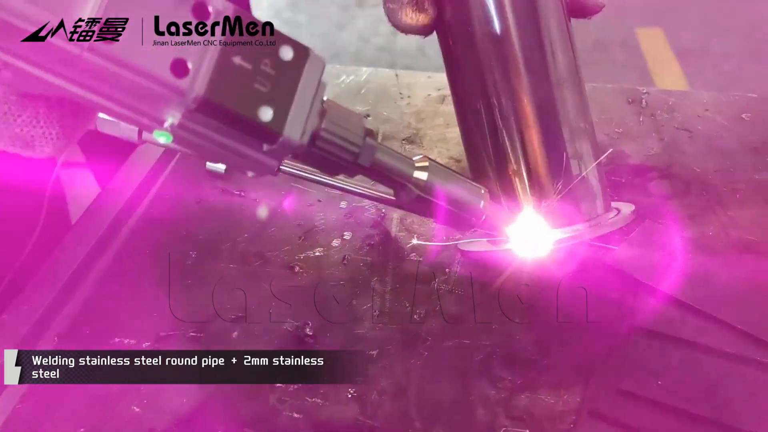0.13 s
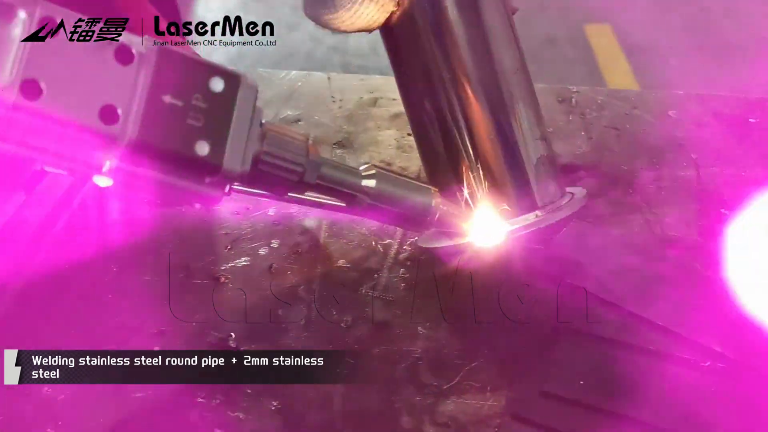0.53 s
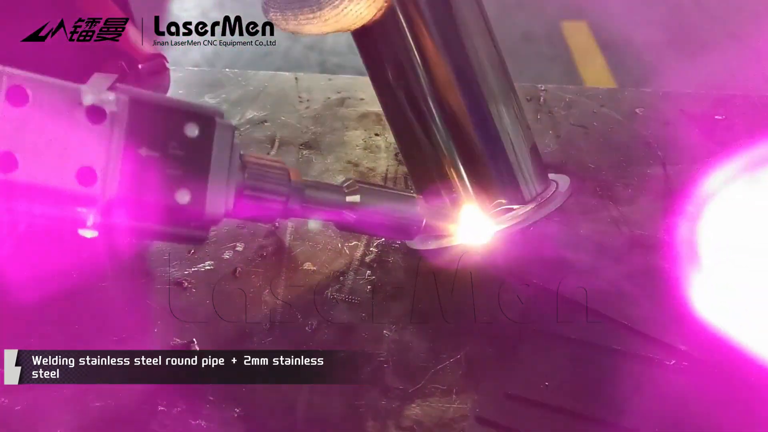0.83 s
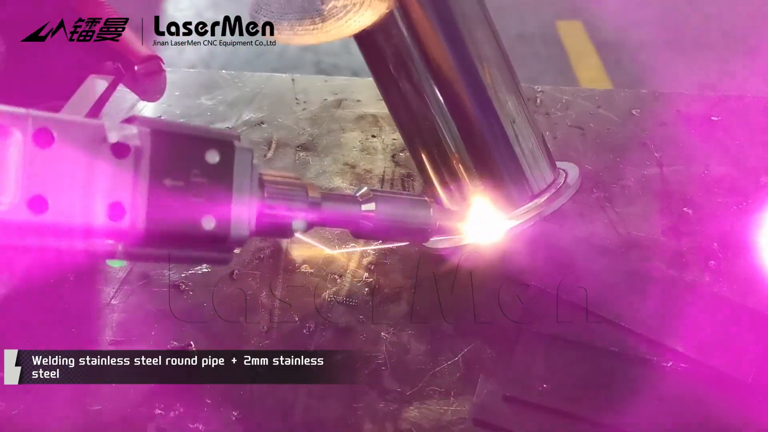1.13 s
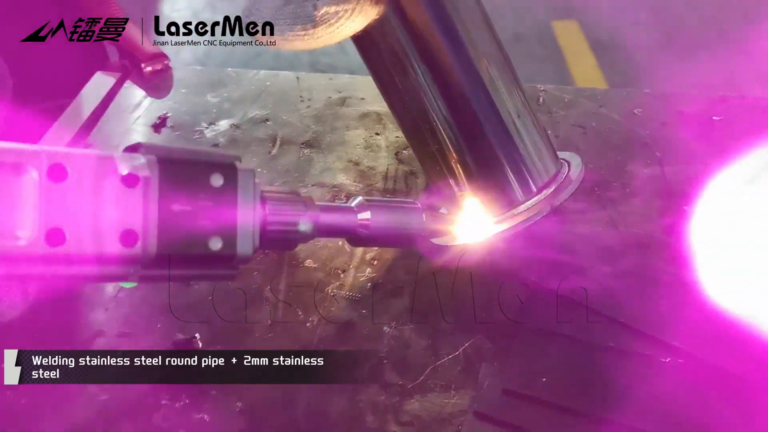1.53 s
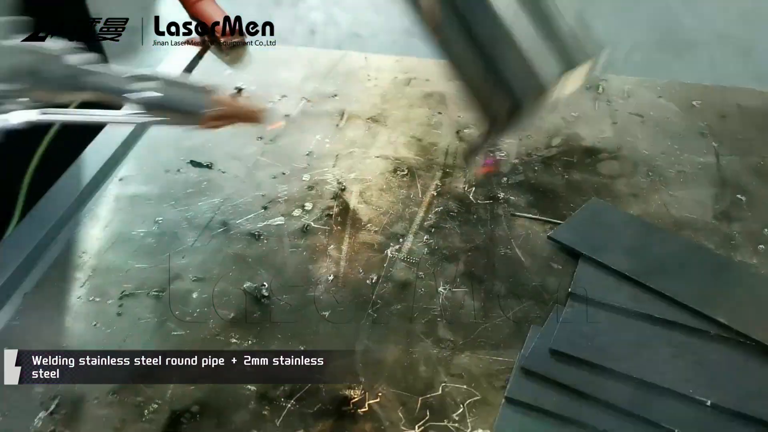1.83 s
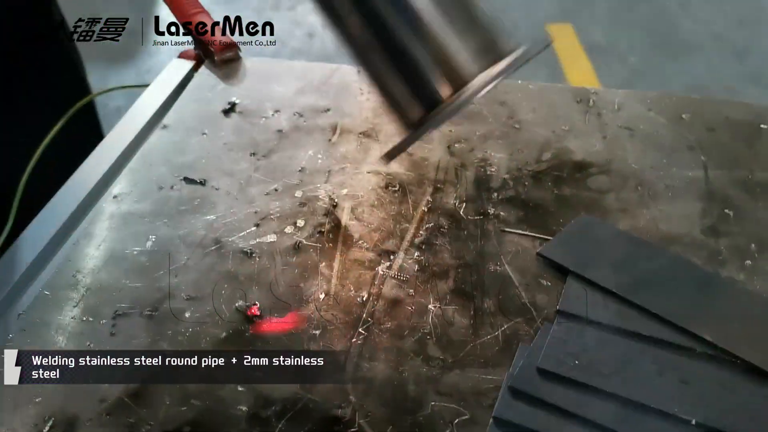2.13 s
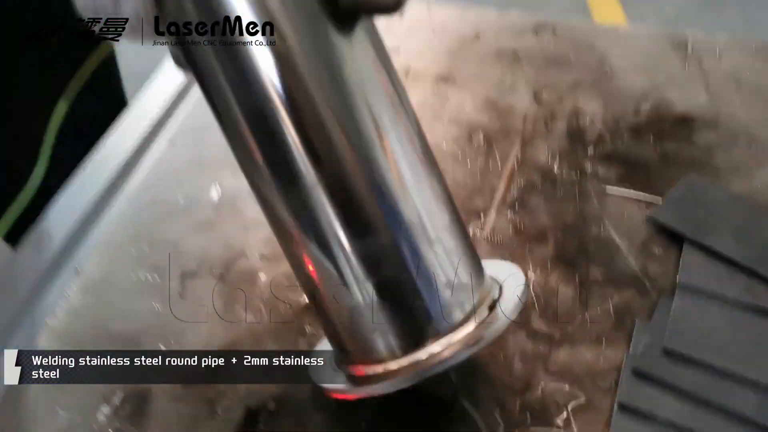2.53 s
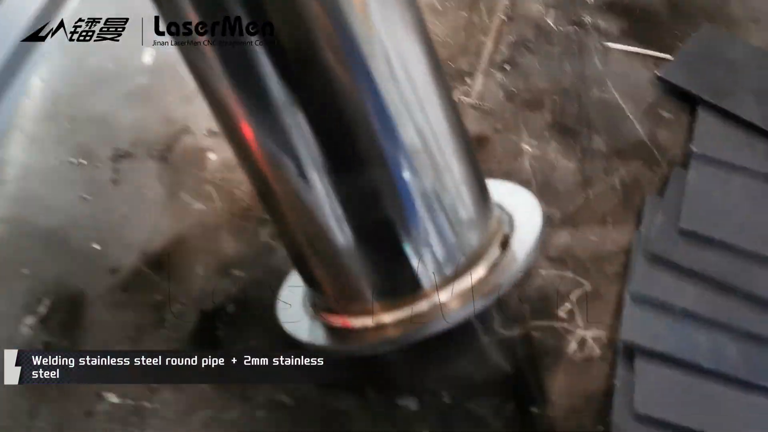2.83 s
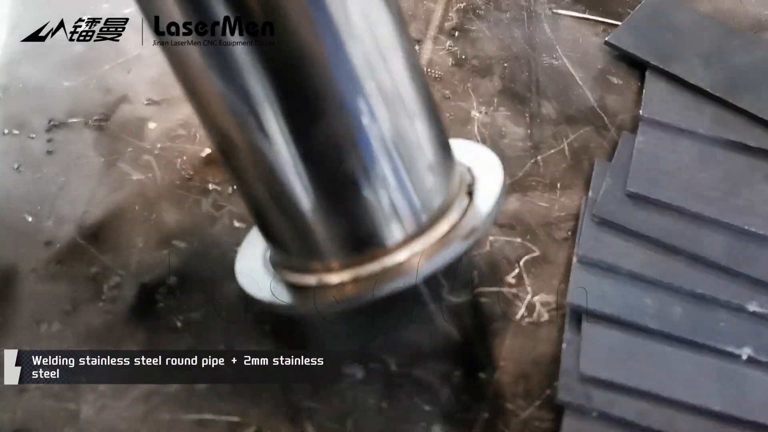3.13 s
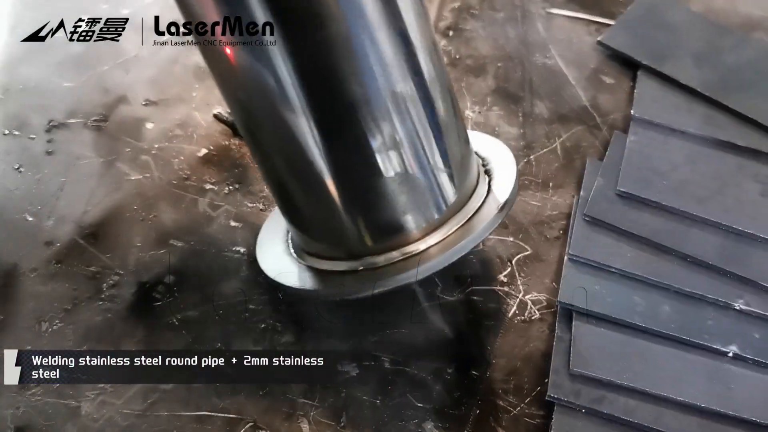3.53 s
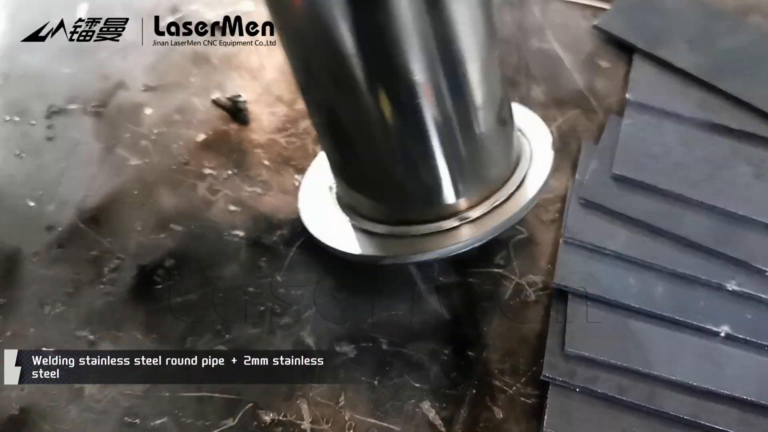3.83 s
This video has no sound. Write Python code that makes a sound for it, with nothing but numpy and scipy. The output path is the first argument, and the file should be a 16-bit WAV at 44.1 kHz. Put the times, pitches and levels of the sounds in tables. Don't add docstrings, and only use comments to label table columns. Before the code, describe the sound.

Bright, fluttering shielding gas hiss from a welding gun, wide in stereo and close-miked; a clack, thinner whistling hiss that dies, then faint workshop hum, ringing knocks, a distant squeak and steel ticks.

```python
import sys
import numpy as np
from scipy import signal
from scipy.fft import rfft, irfft
from scipy.io import wavfile
from scipy.ndimage import uniform_filter1d

SR = 44100
rng = np.random.default_rng(int(sys.argv[2]) if len(sys.argv) > 2 else 0)


def volts_from_db(level):
    exponent = np.asarray(level, float) / 20
    return 10 ** exponent


def waveform_to_disk(signal):
    frames = np.transpose(np.atleast_2d(signal))
    scaled = np.clip(frames, -1, 1) * 32767
    samples = np.round(scaled).astype(np.int16)
    wavfile.write(sys.argv[1], SR, samples)


N = 176400
T, HZ = np.arange(N) / SR, np.fft.rfftfreq(N, 1 / SR) + 1e-3
EARS = np.array([[.5], [-.5]])


def unit(x):
    return x / np.sqrt(np.mean(x ** 2))


def curve(table, column):
    return np.interp(T, np.array(table)[:, 0], np.array(table)[:, column])


def walk(rate):
    hold = max(int(SR / rate), 1)
    levels = rng.standard_normal(N // 40)[:N // hold + 1]
    slewed = uniform_filter1d(uniform_filter1d(np.repeat(levels, hold), hold), hold)
    return unit(slewed[:N])


def ring(x, hz, width, steep):
    f = HZ[-1] * np.linspace(1e-7, 1, x.shape[-1] // 2 + 1)
    return irfft(rfft(x) / (1 + 1j * (f / hz - hz / f) * hz / width) ** steep, x.shape[-1])


def add(out, i, x):
    out[:, i:i + x.shape[1]] += x


def room(x):
    t60, level_db = .25, -7
    t = T[:SR // 2]
    tail = rng.standard_normal((2, SR // 2)) * volts_from_db(-60 * t / t60) * (t > .004)
    tail = tail / np.sqrt(np.sum(tail ** 2, axis=1, keepdims=True))
    return x + volts_from_db(level_db) * signal.fftconvolve(x, tail, axes=1)[:, :N]


def hiss(table, steep, flutter_db, drift_db):
    out = 0
    for hz, width, left_db, right_db in table:
        air = rng.standard_normal((2, N)) * np.sqrt(SR / 2)
        air = air + .05 * air[::-1]
        level_db = np.array([[left_db], [right_db]]) + flutter_db * walk(23.9) + drift_db * walk(4.55)
        out = out + ring(air, hz, width, steep) * volts_from_db(level_db)
    return out


def nozzle_whistle(flow, aim):
    # resonance in Hz, width in Hz, left level in dB, right level in dB.
    nozzle = [(1659, 326, -81, -86.5), (3753, 117, -58.5, -63.5), (4480, 400, -99, -81),
              (5373, 180, -72.5, -68.5), (6706, 157, -70.5, -67), (7540, 3100, -128, -83.5),
              (8865, 450, -60.5, -74.5), (9436, 330, -60.5, -90.5), (10620, 530, -75, -95),
              (11640, 690, -71, -75.5), (12700, 350, -75.5, -83), (14900, 1200, -79.5, -86)]
    flutter_db, surge_db = 1.5, .6
    lower = hiss(nozzle[1:6], 1.38, flutter_db, surge_db)
    lower = irfft(rfft(lower) / (1 + (3934 / HZ) ** 20), N)
    upper = hiss(nozzle[6:], 2.33, flutter_db, surge_db)
    deepest = hiss(nozzle[:1], 3.5, surge_db, 0)
    lower = lower * volts_from_db(flow + (0.85 * EARS - 0.89) * aim)
    return upper * volts_from_db(flow + EARS * aim) + lower + deepest * volts_from_db(0.28 * flow)


def jet_on_steel(closeness, tilt):
    # resonance in Hz, width in Hz, left level in dB, right level in dB.
    steep_jet = [(940, 1850, -89.5, -92.5), (2890, 280, -83, -80.5), (3640, 1270, -79.5, -77.5),
                 (4440, 780, -71.5, -67), (5200, 1200, -67.5, -60.5), (6710, 450, -67, -64.5),
                 (7150, 300, -74, -66), (8050, 540, -89, -70), (9000, 280, -70.5, -79),
                 (9400, 300, -61, -87), (10580, 1120, -66.5, -74.5), (11250, 650, -68.5, -73),
                 (12900, 1900, -79, -76.5), (15200, 2200, -86, -90)]
    # Hz, width in Hz, left in dB, right in dB.
    flat_jet = [(2630, 2400, -85.5, -87.5), (3600, 370, -92, -68.5), (4550, 1100, -93, -74),
                (4860, 580, -71.5, -87), (6100, 930, -93, -64), (6820, 280, -61, -64),
                (7470, 450, -77, -64.5), (8340, 260, -63.5, -125), (8640, 230, -58.5, -90),
                (10170, 350, -79, -72.5), (10670, 220, -65.5, -72), (11600, 2100, -76, -81),
                (13400, 2200, -79.5, -80), (15400, 1200, -87, -96)]
    steep = np.sqrt(1 - tilt) * hiss(steep_jet, 1.88, 0.47, 0.36)
    flat = np.sqrt(tilt) * hiss(flat_jet, 1.5, 1.0, 0.22)
    return (steep + flat) * volts_from_db(closeness + .6 * walk(8.2) + 1.03 * walk(250))


def gun():
    # time in seconds, gas flow in dB, closeness of jet to steel in dB,
    # tilt from 0 steep to 1 flat, nozzle pan in dB.
    moves = [(0, -6, -4.5, 0.12, -2), (.15, -7.5, -2.5, 0.018, -4), (.5, -7.5, -2, 0.067, 2),
             (.75, -11.5, -2, 0.28, -13), (.95, -8, -3, 0.74, -8.5), (1.3, -3, -4, 0.83, -3.5),
             (1.67, -2, -7.5, 0.98, 3), (1.712, -4.5, -16, 1, 0), (1.735, -3.5, -29, 0.53, -3),
             (1.82, -1.5, -33, 0.82, 0), (1.855, -5, -50, .95, -5.5), (1.89, 1, -43, .95, -3),
             (1.97, -0.5, -46, 0.87, -3), (2.02, -0.5, -40, .95, -3), (2.12, -6, -29, .95, -5),
             (2.19, -16.5, -24, 0.9, -5.5), (2.225, -35, -40, 0.66, -7), (2.25, -63, -44, 0.39, -2)]
    flow, closeness, aim = curve(moves, 1), curve(moves, 2), curve(moves, 4)
    tilt = np.clip(curve(moves, 3), 0, 1)
    return nozzle_whistle(flow, aim) + jet_on_steel(closeness, tilt)


def shop():
    # frequency in Hz, level in dB per Hz.
    colour = [(30, -20), (130, -1), (280, -2), (520, -6.5), (1500, -9.5), (4300, -17), (7000, -26.5),
              (15500, -48.5)]
    # time in seconds, gain in dB.
    gain = [(0, -2.5), (.8, -3.5), (1.7, -3), (1.8, -0.5), (1.87, -2), (1.95, -5.5), (2.05, -2.5),
            (2.15, -2.5), (2.3, 1.5), (2.47, 1), (2.6, 4.5), (3.4, 4), (4, 3.5)]
    gain_db = curve(gain, 1)
    colour_hz, colour_db = np.transpose(colour)
    out = 0
    for hz in 32 * 2 ** np.arange(0, 9, 1 / 3):
        mid, side = ring(rng.standard_normal((2, N)), hz, hz / 4, 2)
        band_db = np.interp(np.log(hz), np.log(colour_hz), colour_db)
        if hz < 330:
            swell_db = 2.4 * walk(9.8) + 0.72 * gain_db
        else:
            swell_db = walk(5.63) + 1.4 * np.minimum(gain_db, 0) * (hz > 1800)
        spread = min(hz / 500 + 0.44, 1)
        out = out + volts_from_db(band_db + swell_db + EARS * 1.0) * (mid + spread * side * 2 * EARS)
    return out / np.std(out[:, -SR:]) * volts_from_db(-53 + gain_db)


def hums():
    # start in seconds, length in seconds, level in dB, pitch in Hz.
    modes = [(2.496, 0.028, -41, 414), (2.499, .078, -36, 158), (2.528, 0.048, -46, 365),
             (2.503, .05, -54, 560), (2.525, 0.026, -48, 1039), (2.56, 0.053, -53, 1000),
             (2.63, .025, -53, 1100), (2.505, 0.023, -54, 1190), (2.6, .07, -50.5, 318),
             (2.635, 0.033, -50, 195), (3.465, 0.028, -46, 206), (3.488, .025, -37, 225),
             (3.52, .055, -39, 240), (3.594, 0.019, -38, 197), (3.618, 0.017, -41, 190),
             (3.638, .028, -44.5, 178), (3.678, 0.028, -50, 186), (3.713, 0.022, -46, 135),
             (3.495, 0.045, -54, 1390), (3.575, 0.035, -55, 1390), (3.9, 0.027, -57, 810),
             (1.748, 0.021, -46, 318), (1.772, 0.038, -48, 318), (.434, 0.032, -61, 140),
             (.31, 0.027, -59.5, 197), (1.005, 0.026, -58.5, 257), (.92, .03, -61, 138),
             (1.582, 0.026, -62, 300), (.01, 0.045, -61, 250)]
    wobble, pan_db = 0.019, 3.5
    left_lead = 0.68
    out, t, waver = np.zeros((2, N + SR)), T[:SR // 4], walk(40)
    for s, length, db, hz in modes:
        i = int(s * SR)
        phase = 2 * np.pi * hz * np.cumsum(1 + wobble * np.roll(waver, -i)[:len(t)]) / SR
        swell = (1 - np.exp(-t / (0.25 * length))) * np.exp(-(t / length) ** 3.2)
        add(out, i, np.sin(phase + left_lead * EARS) * swell * volts_from_db(db + 5 + EARS * pan_db))
    return out[:, :N]


def rustles():
    # start in seconds, length in seconds, level in dB, centre in Hz.
    slides = [(.62, .03, -66, 70), (.67, .04, -62, 570), (.985, .04, -63.5, 90), (1.021, .03, -66, 40),
              (1.397, 0.018, -72, 35), (1.706, .085, -51.5, 310), (1.717, 0.015, -51, 1500),
              (1.73, 0.048, -52.5, 900), (1.736, 0.055, -56, 2270), (1.78, 0.14, -66, 130),
              (2.169, .22, -56.5, 229), (2.49, 0.011, -50, 500), (2.493, 0.028, -53, 3280),
              (2.497, .06, -49, 590), (2.501, .03, -68, 11000), (2.902, .023, -62, 6500),
              (2.945, 0.028, -64.5, 9000), (3.19, 0.048, -70.5, 9800), (3.32, .028, -72, 10900),
              (3.413, .29, -49, 195), (3.432, 0.061, -62.5, 6800), (3.435, 0.15, -54, 2030),
              (3.452, .05, -74, 12000), (3.46, 0.19, -55, 805), (3.47, 0.046, -57, 4200),
              (3.585, 0.036, -51, 653), (3.714, 0.033, -58, 6900), (3.72, 0.051, -56, 820),
              (3.716, .03, -65, 11000), (3.72, 0.027, -55.5, 4300)]
    out, t, grain = np.zeros((2, N + SR)), T[:SR], volts_from_db(1.5 * walk(400))
    for s, length, db, hz in slides:
        i = int(s * SR)
        swell = 1.61 * t / length * np.exp(-2.5 * (t / length) ** 3)
        swell = swell * np.roll(grain, -i)[:SR]
        air = rng.standard_normal((2, SR))
        air = air + (hz < 500) * 0.65 * air[::-1]
        rub = unit(ring(air, hz, 1.4 * hz, 4.4))
        add(out, i, rub * swell * volts_from_db(db + 9.0 - 0.83 * EARS * (hz > 999)))
    return out[:, :N]


def knocks():
    # start in seconds, peak in dB, ring in Hz, pan in dB, ring time in seconds.
    hits = [
        (1.732, -36.5, 330, 6.5, 0.13),
        (1.873, -47.5, 309.6, 1.5, 0.17),
        (2.294, -52, 273, 1, 0.25),
        (2.5, -39, 206, 5, 0.17),
        (2.9, -48, 257, 3, 0.32),
        (3.121, -45.5, 294, 0, 0.25),
        (3.775, -48, 133.3, 4, 0.7),
    ]
    # ratio to the ring pitch, level in dB, share of the ring time.
    bench = [(1, 3.5, 0.92), (2.06, -10, 0.76), (2.6, -8, 0.49), (3.9, -4, 0.16), (6.5, -20, 0.6)]
    rise_s, thud_hz, thud_db = 0.002, 435, -1
    tones, dull, t = np.zeros((2, N + SR)), np.zeros((2, N + SR)), T[:SR // 2]
    thud = unit(ring(rng.standard_normal((2, N)), thud_hz, 3.0 * thud_hz, 1.77))
    for s, db, hz, pan_db, t60 in hits:
        i = int(s * SR)
        size = (1 - np.exp(-t / rise_s)) * volts_from_db(db - 5.5 + EARS * pan_db)
        odd_db, odd_pitch = 5.05 * rng.standard_normal(7), 0.0299 * rng.standard_normal(7)
        odd_db[0] = odd_pitch[0] = 0
        for k, (ratio, mode_db, share) in enumerate(bench):
            fall_db = 60 * (t / (t60 * share)) ** 1.335
            tone = np.sin(2 * np.pi * hz * ratio * (1 + odd_pitch[k]) * t)
            add(tones, i, size * volts_from_db(mode_db + odd_db[k] - fall_db) * tone)
        add(dull, i, size * volts_from_db(thud_db - 60 * t / t60) * np.roll(thud, -i, axis=1)[:, :len(t)])
    return tones[:, :N] * volts_from_db(3 * walk(45.06)) + room(dull[:, :N])


def clicks():
    # start in seconds, peak in dB, centre in Hz, ring time in seconds.
    ticks = [
        (1.7334, -17.5, 4150, 0.031),
        (1.734, -23, 7700, .014),
        (2.4985, -41, 3000, .04),
        (2.5, -30, 760, 0.12),
        (2.5, -49, 7500, .05),
        (2.77, -40, 10300, .008),
        (3.5952, -30.5, 3360, 0.026),
        (3.596, -43, 6950, .03),
    ]
    out = 0
    for s, db, hz, t60 in ticks:
        edge = 3 * (np.arange(N) == int(s * SR) + 1)
        push = rng.standard_normal((2, N)) + edge
        fade = (T >= s) * volts_from_db(-60 * np.abs(T - s) / t60)
        burst = ring(push * fade, hz, 0.69 * hz, 2.2)
        out = out + burst / np.abs(burst).max() * volts_from_db(db)
    return out


def squeak():
    # time in seconds, pitch in Hz, level in dB.
    whine = [
        (2.29, 3510, -72),
        (2.35, 3500, -67),
        (2.45, 3540, -73),
        (2.64, 3540, -68),
        (2.73, 3540, -60),
        (2.92, 3480, -61),
        (3.07, 3415, -62),
        (3.15, 3410, -66),
        (3.33, 3370, -67),
    ]
    phase = 2 * np.pi * np.cumsum(curve(whine, 1) + 14 * walk(60)) / SR
    heard = (T > whine[0][0]) * (T < whine[-1][0])
    ears = []
    for offset in range(2):
        level = volts_from_db(curve(whine, 2) + 4 * walk(29.43))
        ears.append(np.sin(phase + offset) * level * heard)
    return np.array(ears)


def scene():
    around = shop() + room(clicks() + rustles())
    bright_band = volts_from_db(-1) * ring(around, 7220, 760, 1)
    return gun() + squeak() + knocks() + room(hums()) + around + bright_band


def low_pass(x):
    return signal.sosfilt(signal.butter(12, 17000, fs=SR, output="sos"), x)


def record(dry):
    top_hz = 15830
    mix = irfft(rfft(dry) * (HZ < top_hz), N)
    return low_pass(mix)


dry = scene()
out = record(dry)
waveform_to_disk(out)
```